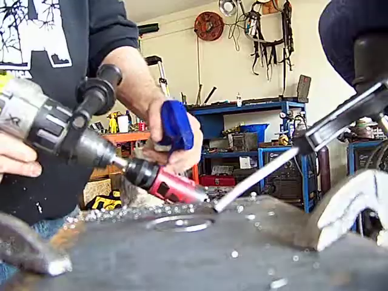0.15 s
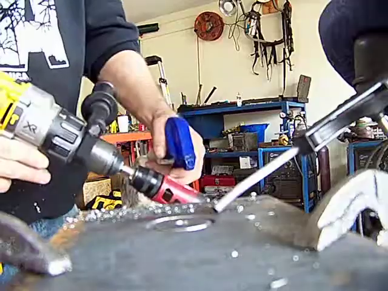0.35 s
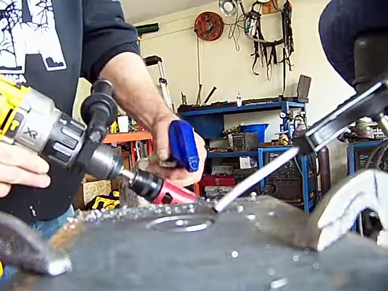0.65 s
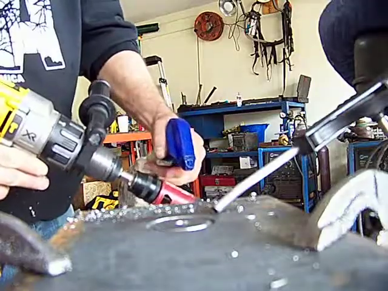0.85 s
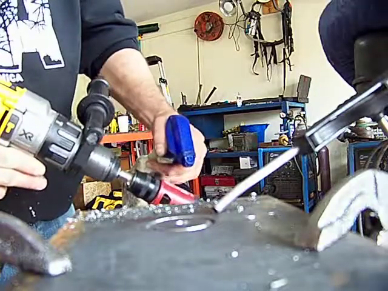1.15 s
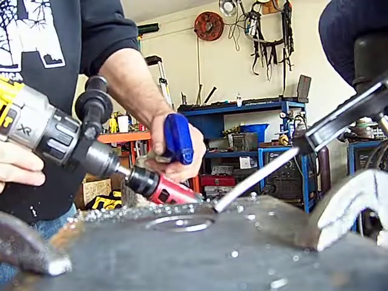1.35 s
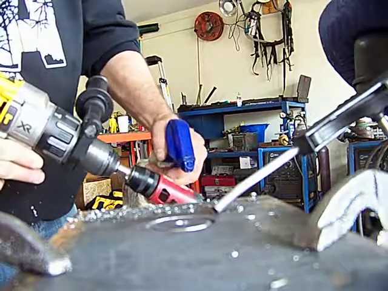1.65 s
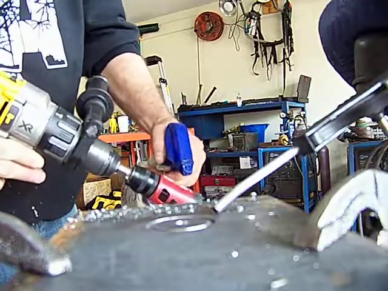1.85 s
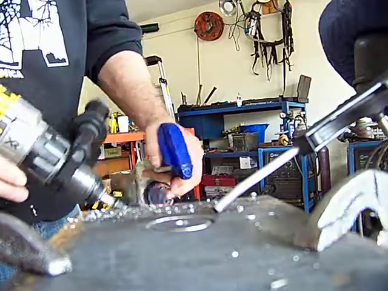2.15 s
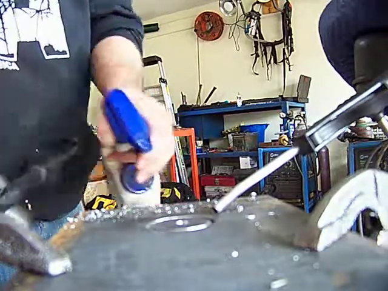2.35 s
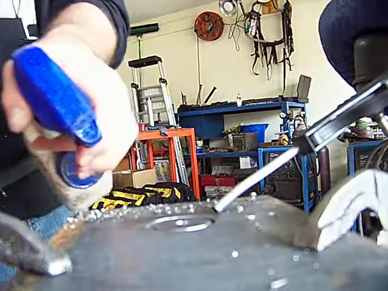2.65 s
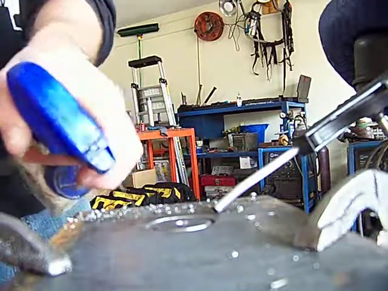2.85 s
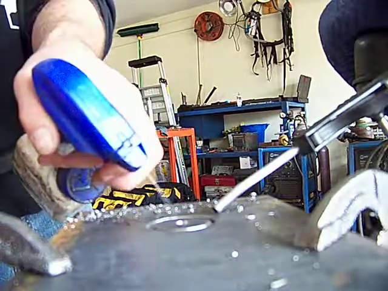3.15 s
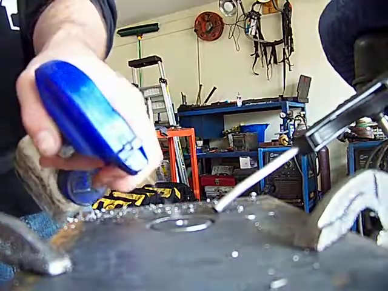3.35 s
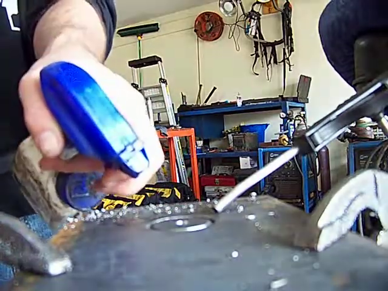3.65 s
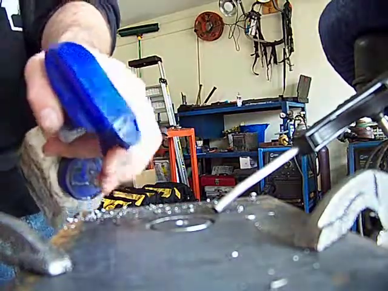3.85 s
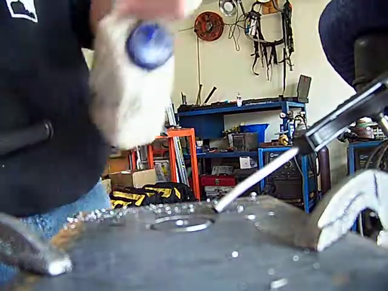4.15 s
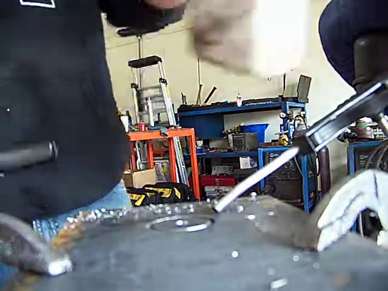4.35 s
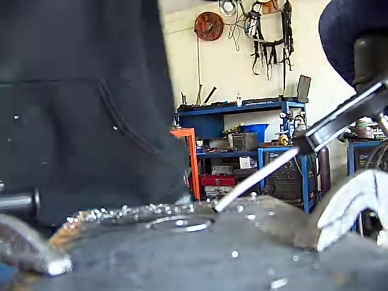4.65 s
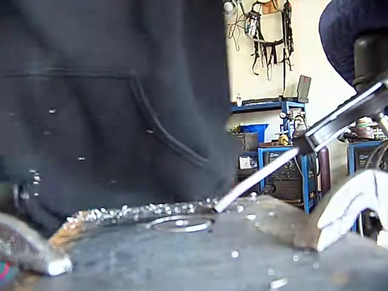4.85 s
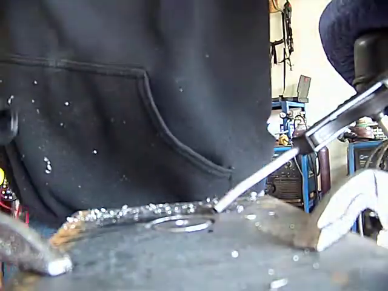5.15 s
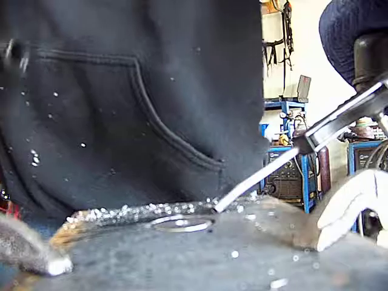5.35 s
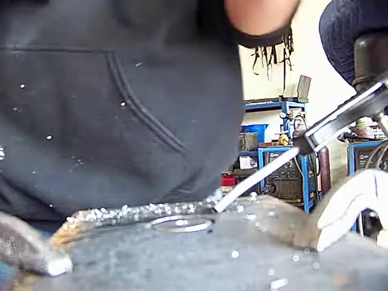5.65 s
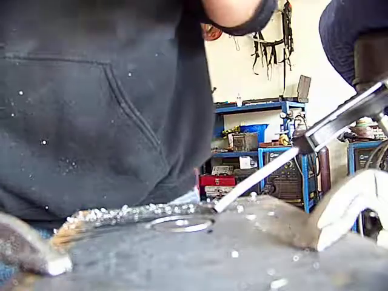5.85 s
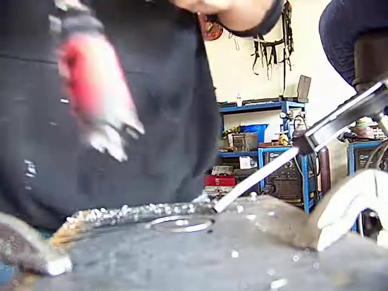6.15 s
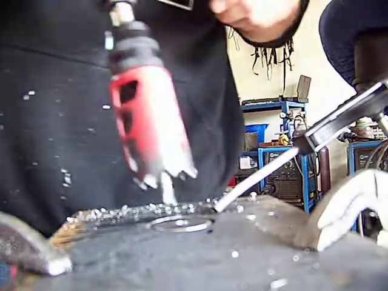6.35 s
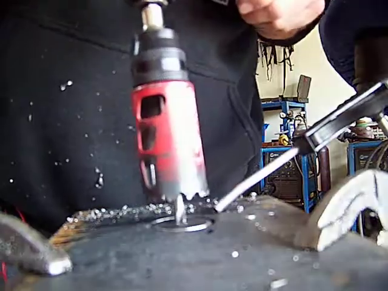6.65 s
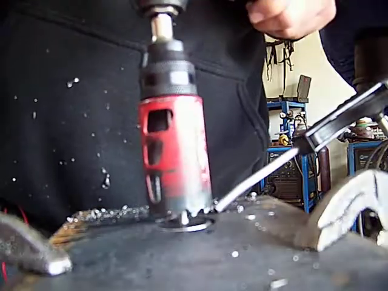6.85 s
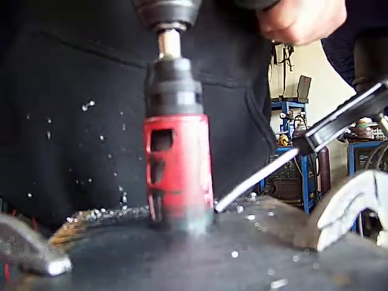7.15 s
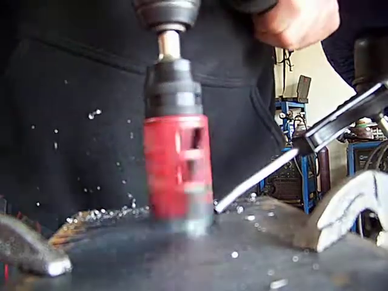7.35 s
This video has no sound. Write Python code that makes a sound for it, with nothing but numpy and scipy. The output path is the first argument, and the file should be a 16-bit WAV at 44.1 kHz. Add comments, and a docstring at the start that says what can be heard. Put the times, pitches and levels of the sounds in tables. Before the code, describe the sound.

A failing microphone gives off a loud, shrill, steady hiss that buries nearly everything in a workshop. A faint electrical buzz and a few small ticks lie underneath. The hiss shifts slightly in tone around the middle and again near the end. In the last moment a drill quietly whines up and the teeth of a hole saw scrape on a steel plate.

```python
"""Hole saw behind a failing microphone

A failing microphone's shrill, saturating hiss buries nearly everything. Reflections shift its colour
as a spray bottle is held to the cut and a hole saw comes down on a steel plate. At the very end the
drill whines up and the teeth scrape. Underneath lie a few ticks, an electrical buzz and a noise floor."""
import sys
import numpy as np
from scipy import signal
from scipy.fft import rfft, irfft
from scipy.io import wavfile
from scipy.ndimage import uniform_filter1d

SR = 44100
rng = np.random.default_rng(int(sys.argv[2]) if len(sys.argv) > 2 else 0)


def put_to_file(sound):
    """Save the sound as 16-bit audio at rate SR, in the file named by the first command-line argument."""
    columns = np.atleast_2d(sound).T  # one column per channel
    safe = np.clip(columns, -1, 1)
    whole_steps = np.round(safe * 32767)
    wavfile.write(sys.argv[1], SR, whole_steps.astype(np.int16))


N = 330750
TIME, FREQ = np.arange(N) / SR, np.arange(N // 2 + 1) * SR / N


def from_db(db):
    """Decibels to gain."""
    return 10 ** (np.asarray(db) / 20)


def rms_one(x):
    """Scale to rms 1."""
    return x / np.sqrt(np.mean(np.abs(x) ** 2) + 1e-20)


def spectrum_db(points):
    """An EQ curve: points joined by lines over log frequency."""
    hz, db = np.transpose(points)
    return np.interp(np.log(FREQ + 1), np.log(hz), db)


def bells_db(bells):
    """An EQ curve of smooth peaks and dips, widths taken at half height."""
    return sum(db * .5 ** ((2 * (FREQ - hz) / width) ** 2) for hz, width, db in bells)


def colour(x, db):
    """Apply an EQ curve."""
    return irfft(rfft(x) * from_db(db), N)


def resonate(x, hz, width):
    """A resonance with gain 1 at its peak."""
    r = np.exp(-np.pi * width / SR)
    feedback = [1, -2 * r * np.cos(2 * np.pi * hz / SR), r * r]
    return signal.lfilter(np.array([1, 0, -1]) * (1 - r * r) / 2, feedback, x + 1e-18)


def move(middle_s, length_s):
    """A linear ramp from 0 to 1."""
    return np.clip((TIME - middle_s) / length_s + .5, 0, 1)


def swell(peak_s, half_s):
    """A linear rise to 1 and fall back to 0."""
    return np.maximum(1 - np.abs(TIME - peak_s) / half_s, 0)


def microphone_hiss(level_db=-14, skirt_db=-20.0, ceiling_db=3.0, hardness=5.5, mirror_hz=8000):
    """The failing microphone drives noise in a broad resonance near 7 kHz against a ceiling."""
    # the hiss's tone with nothing nearby: frequency_hz, gain_db
    hiss_tone = [(4230, -47), (4500, -26.5), (4720, -25.5), (5000, -15), (5420, -11), (5660, -12.5),
                 (6050, -7.5), (6950, -5), (7200, -1.5), (7580, -2.5), (8000, -10), (8420, -13.5),
                 (8780, -23), (9050, -63)]
    tone_db = spectrum_db(hiss_tone)
    # the microphone samples slowly, so the top of its band mirrors upwards and beats with its image
    noise = irfft(rfft(rng.standard_normal(N)) * (FREQ < mirror_hz), N)
    aliased = noise * (1 + 2 * np.cos(2 * np.pi * 2 * mirror_hz * TIME))
    core = colour(aliased, np.maximum(tone_db, skirt_db))
    colours, change_db = nearby_reflections()
    reflected = core + sum(share * (colour(core, bells_db(bells)) - core) for share, bells in colours)
    # the largest swings saturate, so the hiss is denser and flatter than free noise
    swing = rms_one(signal.hilbert(reflected))
    saturated = swing.real / (1 + (np.abs(swing) / from_db(ceiling_db)) ** hardness) ** (1 / hardness)
    band = colour(saturated, np.minimum(tone_db - skirt_db, 0))
    levelled = band / np.sqrt(uniform_filter1d(band ** 2, size=12000))
    return from_db(level_db + change_db) * levelled


def nearby_reflections(bottle_db=1.0, sunk_db=-1.0, seated_db=-.5):
    """Bottle and saw reflect as they come close: EQ bells with their fades, and a level ride in dB."""
    # the bottle sweeps past the microphone: closest_s, colour_share (0-1)
    passes = [(2.87, 1.0), (3.89, 1.0), (4.56, .6)]
    # reflections off the passing bottle: centre_hz, width_hz, gain_db
    passing_eq = [(6150, 910, 2), (7500, 340, -2.5), (8400, 300, -3)]
    # off the bottle held at the cut: centre_hz, width_hz, gain_db
    bottle_eq = [(5400, 590, -1.5), (6170, 670, -2.5), (7180, 500, 3), (8820, 440, 4)]
    # off the saw above the plate: centre_hz, width_hz, gain_db
    above_eq = [(4550, 300, -4), (6750, 330, -4), (7800, 550, 2)]
    # off the saw sunk towards the plate: centre_hz, width_hz, gain_db
    sunk_eq = [(5050, 500, -7.5), (5970, 350, 5), (7270, 450, -7), (8700, 320, -3.5)]
    # off the saw seated in the groove: centre_hz, width_hz, gain_db
    seated_eq = [(4550, 300, -4), (5400, 1000, -3.5), (6600, 700, -4), (7650, 300, 0)]
    passing = sum(share * swell(closest_s, half_s=.14) for closest_s, share in passes)
    bottle = move(middle_s=3.0, length_s=.11) - move(middle_s=3.83, length_s=.11)
    above = move(middle_s=6.43, length_s=.17)
    sunk = move(middle_s=6.82, length_s=.3)
    seated = move(middle_s=7.115, length_s=.04)
    colours = [(passing, passing_eq), (bottle, bottle_eq), (above * (1 - seated), above_eq),
               (sunk * (1 - seated), sunk_eq), (seated, seated_eq)]
    return colours, bottle_db * bottle + sunk_db * sunk + seated_db * seated


def saw_teeth(level_db=-36.5, chips_per_s=2500, chip_spread_db=1.5):
    """The teeth break chips that ring the saw cup and plate: a steady scrape with harder bites."""
    # resonances of cup and plate: pitch_hz, width_hz, gain_db
    modes = [(935, 300, -7.5), (1950, 220, -6.5), (2330, 210, -2), (2580, 220, -2), (2800, 220, -2),
             (3600, 120, -11)]
    # the teeth bite harder: peak_s, level_db
    bites = [(7.18, -38), (7.278, -35), (7.417, -34), (7.487, -35)]
    chips = (rng.random(N) < chips_per_s / SR) * rng.choice([-1, 1], N)
    chips = chips * from_db(chip_spread_db * rng.standard_normal(N))
    scrape = sum((-1) ** k * from_db(db) * resonate(chips, hz, width)
                 for k, (hz, width, db) in enumerate(modes))
    contact = from_db(level_db) * move(middle_s=7.17, length_s=.03)
    biting = sum(from_db(db) * swell(peak_s, half_s=.025) for peak_s, db in bites)
    return (contact + biting) * rms_one(scrape)


def drill_motor(start_s=7.18, spin_up_s=.014, whine_hz=3080, level_db=-39.0):
    """The whine climbs and grows with speed, sways once per turn of the saw and trembles under load."""
    turns_per_s, crest_s, sway_hz, jitter_hz = 8.0, 7.40, 38, 18.0
    upper_ratio, upper_db = 1.167, -13.0
    speed = 1 - np.exp(-np.maximum(TIME - start_s, 0) / spin_up_s)
    sway = sway_hz * np.cos(2 * np.pi * turns_per_s * (TIME - crest_s))
    tremble = jitter_hz * rms_one(uniform_filter1d(rng.standard_normal(N), size=200))
    phase = 2 * np.pi * np.cumsum(speed * (whine_hz + sway + tremble)) / SR
    whine = np.sin(phase) + from_db(upper_db) * np.sin(upper_ratio * phase)
    return np.sqrt(2) * from_db(level_db) * speed ** 3 * whine


def ticks(gain_db=34.0, lowpass_hz=6000):
    """Single sharp clicks, most of them near a half-second beat."""
    # the impulses behind the ticks: start_s, relative_level_db
    hits = [(0.8826, -29), (2.3756, -32), (2.6638, -39), (3.3737, -32), (3.8525, -27), (4.3605, -32),
            (4.8606, -32), (6.3535, -34), (7.0922, -33)]
    clicks = np.zeros(N)
    for start_s, db in hits:
        clicks[round(start_s * SR)] = from_db(db + gain_db)
    dulled = signal.sosfilt(signal.butter(3, lowpass_hz, fs=SR, output="sos"), clicks)
    return resonate(dulled, hz=4200, width=5500)


def electrical_buzz(pitch_hz=56.354, scatter_rad=.42, rasp_db=-50.5, sharpness=8.0):
    """A steady train of electrical pulses, each with a short spit of noise."""
    # partials of the pulse train: harmonic_number, rms_level_db
    partials = [(1, -59.5), (2, -50), (3, -62), (5, -45), (6, -52.5), (8, -51), (9, -57.5), (11, -48.5),
                (12, -46.5), (13, -47), (14, -59.5), (15, -46.5), (16, -50), (17, -55.5), (26, -57.5)]
    phase = 2 * np.pi * pitch_hz * TIME
    hum = sum(from_db(db) * np.sqrt(2) * np.cos(round(k) * phase + scatter_rad * rng.standard_normal())
              for k, db in partials)
    pulse = np.exp(sharpness * (np.cos(phase) - 1))
    rasp = resonate(pulse * rng.standard_normal(N), hz=700, width=600)
    return hum + from_db(rasp_db) * rms_one(rasp)


def noise_floor(level_db=-32.82):
    """A bed of nearly white noise that falls away just below the hiss's band."""
    # the bed's tone: frequency_hz, gain_db
    floor_tone = [(20, 1), (80, -.5), (300, -0.8), (1000, -0.5), (2700, 0.1), (3050, -0.5), (3300, -3),
                  (3600, -2), (3850, -4.5), (4070, -12), (4210, -23.5), (4600, -27)]
    return from_db(level_db) * rms_one(colour(rng.standard_normal(N), spectrum_db(floor_tone)))


def scene():
    """One microphone feeds both channels."""
    mono = microphone_hiss() + noise_floor() + electrical_buzz() + ticks() + drill_motor() + saw_teeth()
    return np.array([mono, mono])


def record(dry):
    """A steep low-pass cuts the top off the mix."""
    cutoff_hz = 8950
    return signal.sosfilt(signal.ellip(12, .1, 100, cutoff_hz, fs=SR, output="sos"), dry)


dry = scene()
out = record(dry)
put_to_file(out)
```